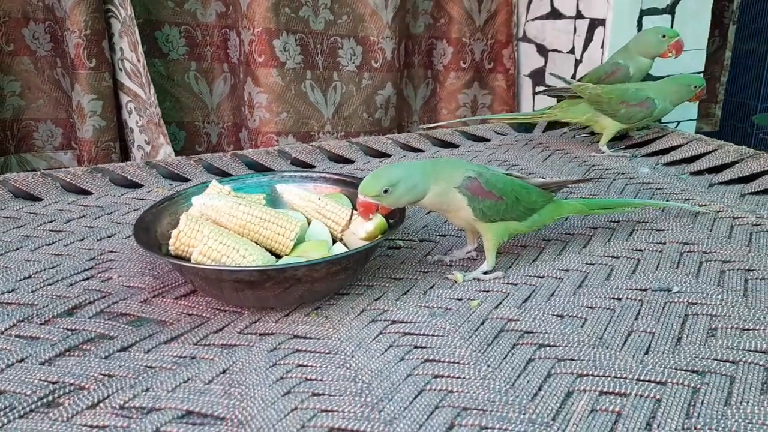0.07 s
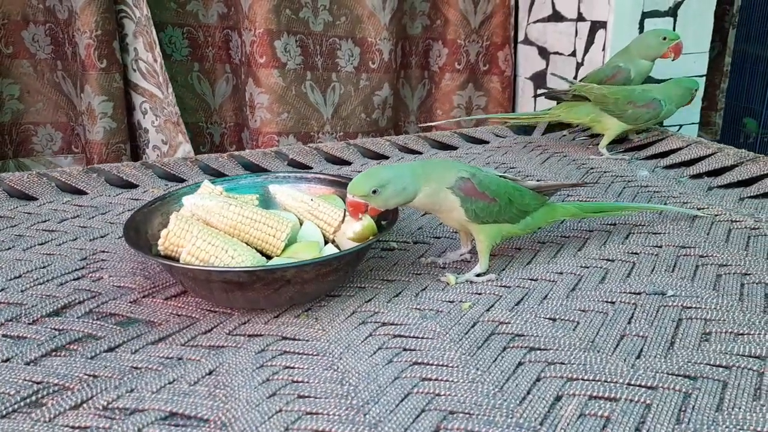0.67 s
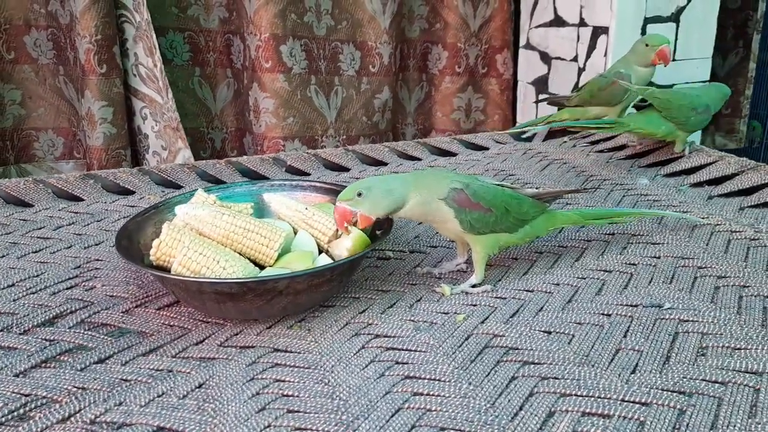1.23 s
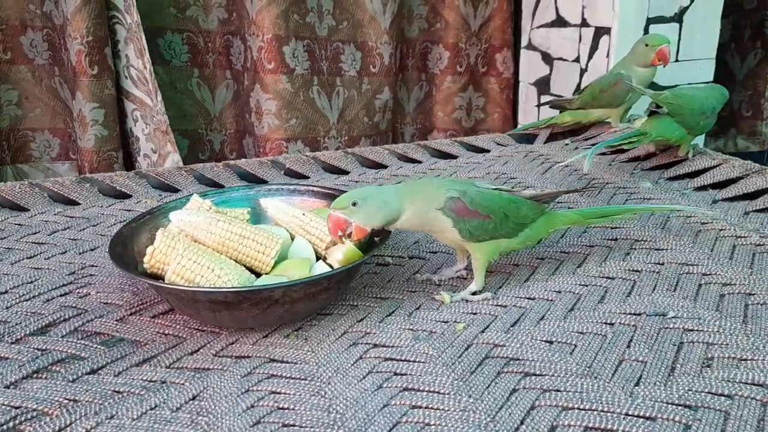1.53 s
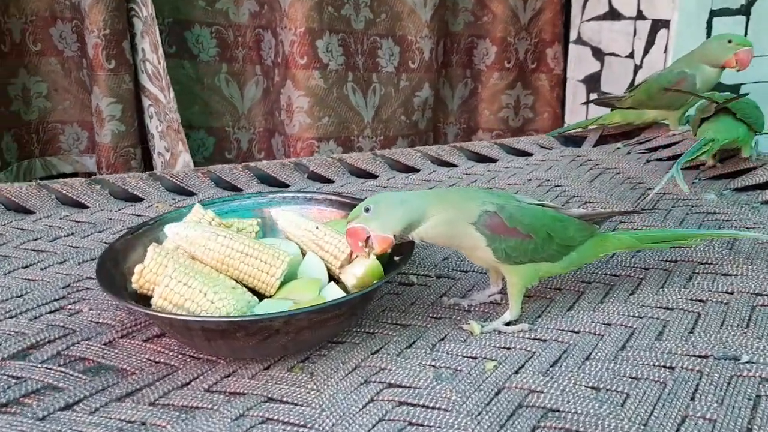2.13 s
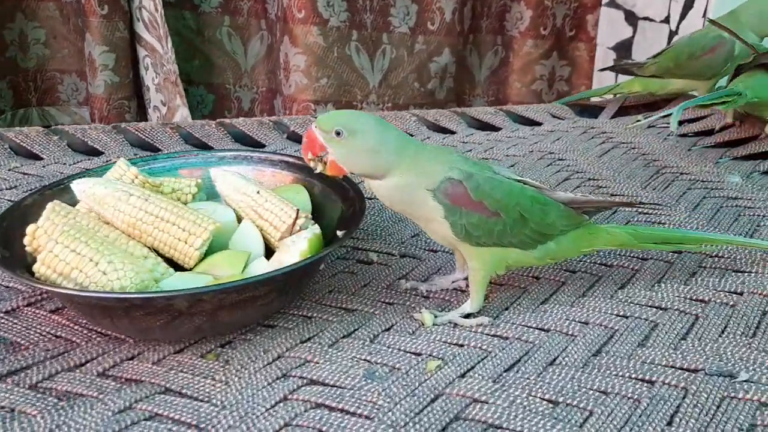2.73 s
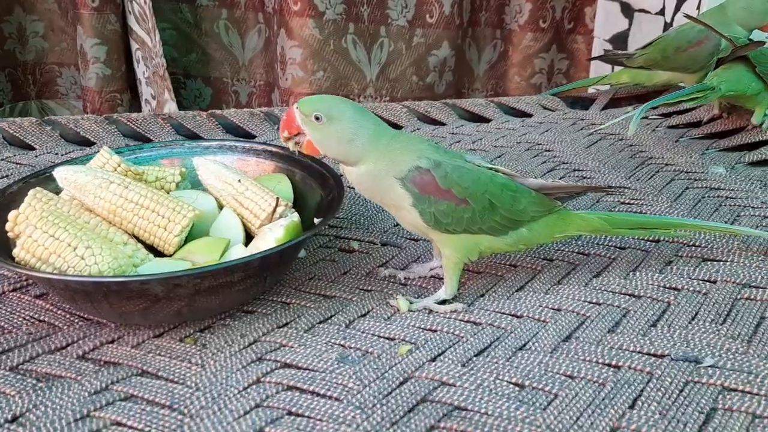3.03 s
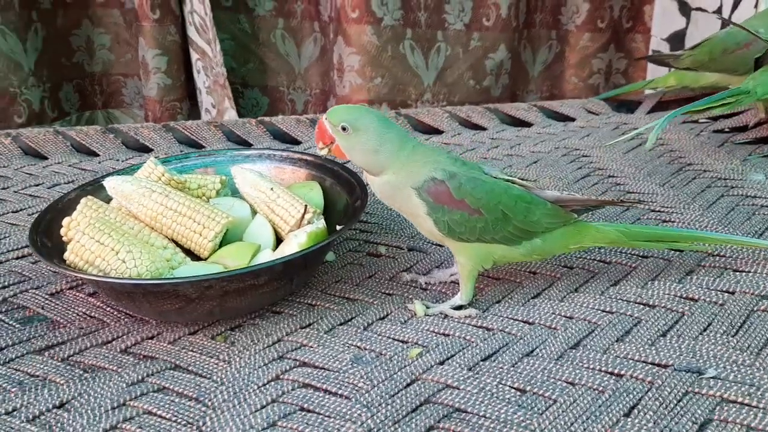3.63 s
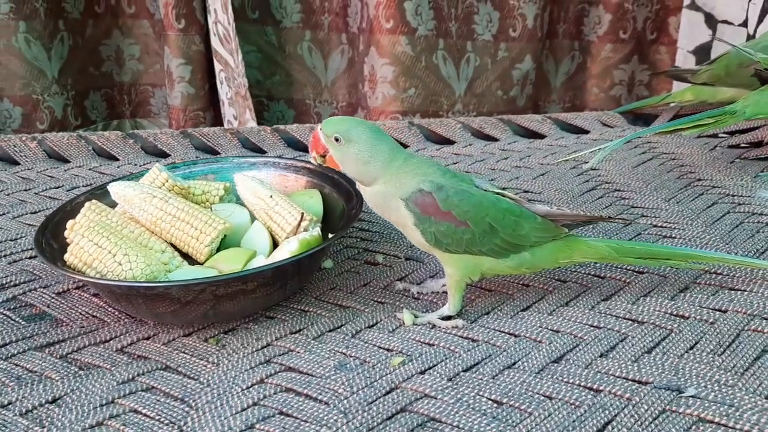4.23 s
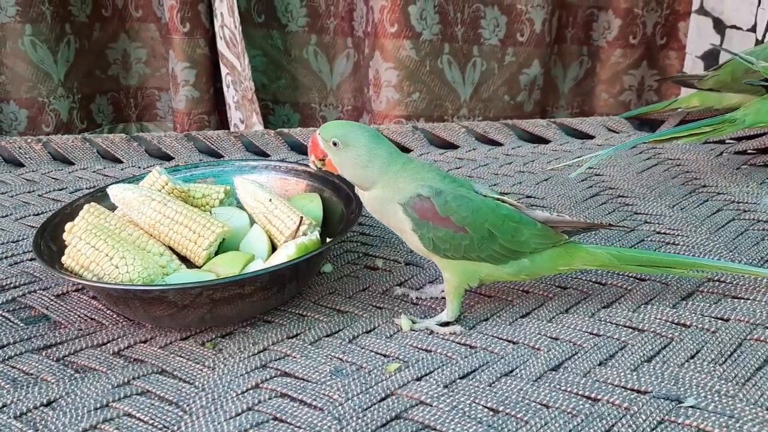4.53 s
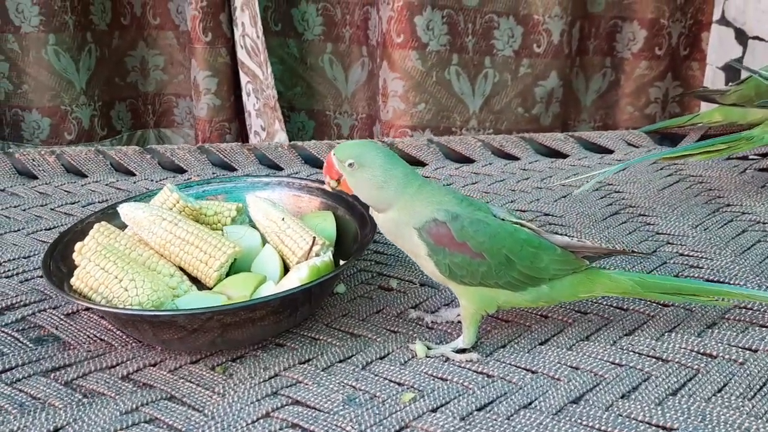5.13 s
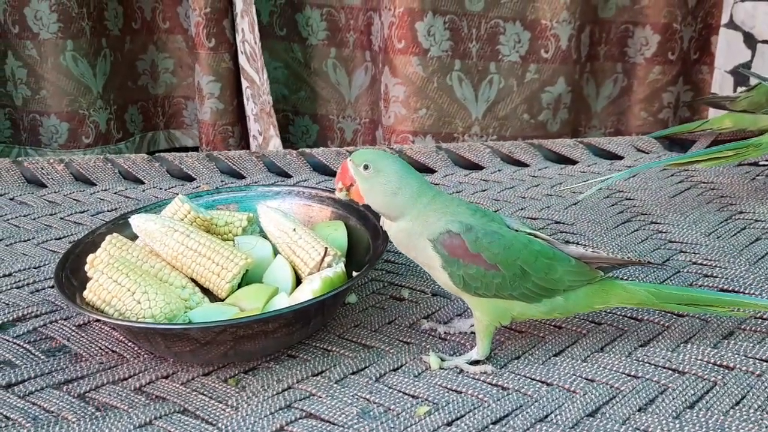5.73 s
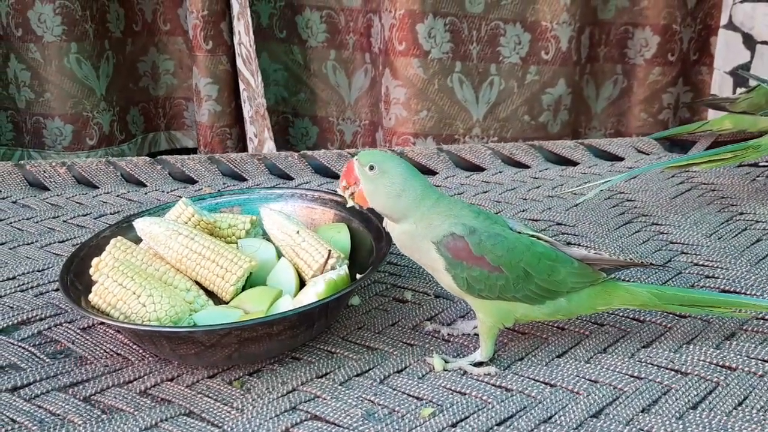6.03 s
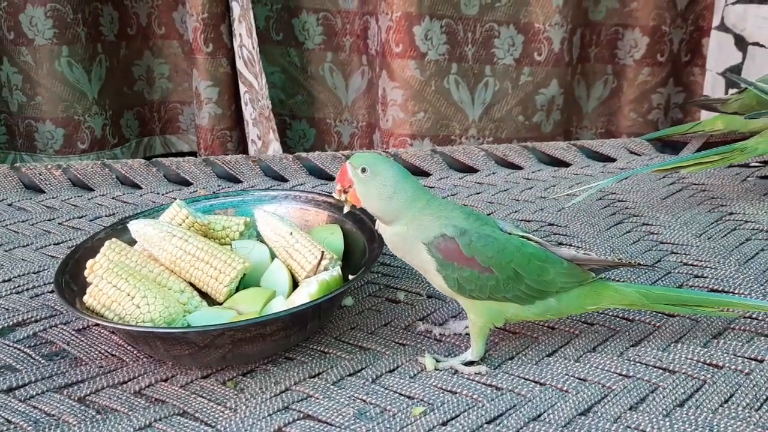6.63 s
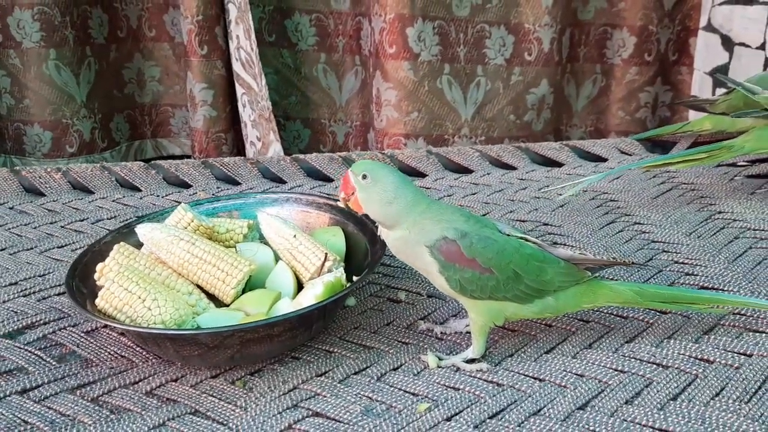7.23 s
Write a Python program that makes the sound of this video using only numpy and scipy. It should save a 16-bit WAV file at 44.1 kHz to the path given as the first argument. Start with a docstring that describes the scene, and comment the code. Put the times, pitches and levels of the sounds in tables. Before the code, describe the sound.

Three loud, harsh parrot squawks open the scene, at the very start, at about 0.8 seconds and at about 2 seconds. Each is a short buzzy rasp followed by a longer piercing cry, close, toward the left, with a small room echo. A distant engine throbs low under a soft wash of outdoor air throughout, growing somewhat stronger from about 4 seconds. Very faint feather rustles come and go between 2 and 6 seconds, and blurred far-off bird calls appear near 1.8, 3.2, 4.5 and 7.4 seconds. At 3.8 seconds a beak quietly cracks a kernel, and at 4 seconds a metal bowl rings faintly from light touches. At 5.5 seconds comes one thin squeak that rises scratchily, whistles and falls into a rasp. Four more small, dry cracks follow at about 6, 6.7, 7 and 7.2 seconds.

```python
"""Parakeets on a woven cot in a small room, with an engine throbbing outside all the way through.
First come three harsh squawks, each a rasp and then a cry, buzzed by the two sides of a bird's voice box.
From about 2 seconds on, feathers rustle and other birds call far off. Near 4 seconds one bird starts
to nibble and lightly rings its metal bowl. At 5.5 seconds there is one thin squeak,
and after it a beak cracks a few more kernels."""
import sys
import numpy as np
from scipy import signal
from scipy.fft import rfft, irfft, next_fast_len
from scipy.io import wavfile

SR = 44100
rng = np.random.default_rng(int(sys.argv[2]) if len(sys.argv) > 2 else 0)


def to_wav(sig):
    """Store sig (one row per channel, or 1-D mono) as 16-bit WAV at the path in sys.argv[1].

    Samples outside -1..1 are clipped; the rate is SR.
    """
    pcm = np.clip(np.atleast_2d(sig), -1, 1) * 32767
    pcm = np.round(pcm).astype(np.int16)
    wavfile.write(sys.argv[1], SR, pcm.T)  # frames by channels


N = 330309
TIME = np.arange(N) / SR
TOP_HZ = 15600  # upper limit of the treble


def voice_box(hz, rough, throat, side_ratio, flutter, throb, low_beat, jitter, fray, hiss_db):
    """A bird's voice box has two sides that buzz at different pitches and shake each other."""
    rough, count = np.clip(rough, 0, 1), len(hz)
    wobble = (.0015 + .005 * rough ** 4) * band(count, 0, 300)
    upper_cycles = np.cumsum(hz * (1 + wobble)) / SR
    # the lower side drifts, and loses its beat as the voice breaks up
    lower_cycles = side_ratio * upper_cycles + .06 * band(count, 0, 50)
    lower_cycles += .07 * rough ** 5 * band(count, 0, 400)
    # beats between the sides put extra tones around every harmonic
    beat = 2 * np.pi * (upper_cycles - lower_cycles)
    shake = np.sin(2 * np.pi * (2 * lower_cycles - upper_cycles)) + low_beat * np.sin(beat)
    shake *= 1 + .22 * band(count, 0, 70)
    phase = 2 * np.pi * upper_cycles + jitter * rough ** 3 * band(count, 0, 1800)
    sway = flutter * rough ** .3 * shake
    blur = fray * rough * band(count, 0, 500)
    buzz = np.zeros(count)
    for k in range(16):
        unsteady = sway * min(k * k / 7, 7) + blur * np.clip(k - 3, 0, 3)  # low harmonics stay firm
        smear = k * k / 2  # the airway smears each pulse
        buzz += np.cos(k * phase + unsteady + smear) * (k * hz < TOP_HZ)
    # the beat also sounds by itself, faint and hoarse
    undertone = amp(-25.5) * (np.cos(beat) + np.cos(2 * beat)) * (.55 + .7 * band(count, 0, 350))
    # rushing air hisses in puffs, once a cycle
    hiss = shaped(rng.standard_normal(count), lambda f: amp(read([(4500, -19), (9500, 0)], f)))
    puffs = amp(hiss_db) * rough * hiss * (1 + 1.8 * np.cos(phase))
    source = (unit(buzz) + undertone + puffs) * (1 + throb * np.sqrt(rough) * shake)
    return unit(shaped(source, lambda f: amp(read(throat, f)) * high_pass(f, 330)))


# How throat and beak colour a rasp. Each row: frequency in Hz, gain in dB.
RASP_COLOUR = [(300, -2), (780, -1), (1050, -6.5), (1450, -10.5), (2120, 8), (2400, 6.5), (2700, 11),
               (3200, 12.5), (3500, 14.5), (4150, 0.5), (4800, -3), (6100, -1.5), (7100, -5.5),
               (8800, -5.5), (10800, -18.5), (12400, -13.5), (15500, -22)]

def rasp(length, pitch_hz, flick, db, swell_db, first_rough, last_rough, first_low_db, last_low_db):
    """A short note, its two sides locked at five to eight, that flicks upward and frays at the end."""
    t = np.arange(0, length, 1 / SR)
    flick_before_end_s, flick_width_s, break_up_s = .014, .021, .085
    hz = pitch_hz * (1 + flick * np.exp(-abs(length - flick_before_end_s - t) / flick_width_s))
    rough = first_rough + (last_rough - first_rough) * np.exp(-((length - t) / break_up_s) ** 4)
    voice = voice_box(hz, rough, RASP_COLOUR, side_ratio=5 / 8, flutter=.36, throb=.68,
                      low_beat=.2, jitter=.2, fray=.65, hiss_db=-1.5)
    # the throat's low ring, at 2070 Hz, swells or fades as the beak moves
    low_ring = shaped(voice, lambda f: np.exp(-((f - 2070) / 190) ** 2))
    voice += low_ring * (amp(np.linspace(first_low_db, last_low_db, len(t))) - 1)
    level = amp(db + swell_db * (t / length - .5))
    return level * envelope(t, attack_s=.011, release_s=.0074) * voice


# How throat and beak colour a cry. Each row: frequency in Hz, gain in dB.
CRY_COLOUR = [(450, 4), (750, 2), (1150, -13.5), (1580, 2), (2000, 1), (2320, 4.5), (2570, 9), (2850, -0.5),
              (3180, 7), (3450, 12.5), (3750, 10.5), (4050, -1.5), (4620, 0), (5100, -5), (5750, -8.5),
              (6450, -7), (7000, -6), (7350, -4.5), (7700, -10.5), (8100, -4), (8700, -10), (9250, -8),
              (10300, -17), (11300, -15), (11900, -22), (12700, -13.5), (15500, -22.5)]

def cry(course):
    """A longer, piercing note that scoops up roughly, rings clear, and drops as it ends."""
    t = np.arange(0, course[-1][0] - course[0][0], 1 / SR)
    hz, db = curves(course, course[0][0] + t)
    scoop_s, drop_s = .068, .0145
    scoop = np.exp(-(t / scoop_s) ** 4)
    drop = np.exp(-((t[-1] - t) / drop_s) ** 2)
    tremor = .0018 * band(len(t), 0, 158)
    hz = hz * (1 + tremor - .074 * drop)
    rough = .2 + .22 * (scoop + drop)
    voice = voice_box(hz, rough, CRY_COLOUR, side_ratio=.612, flutter=.23, throb=.37,
                      low_beat=.45, jitter=.8, fray=.45, hiss_db=1)
    return amp(db + 2.07) * envelope(t, attack_s=.012, release_s=.0055) * voice


# The first note of each squawk. Each row: start and length in seconds, pitch in Hz, upward flick as a
# share of the pitch, level in dB, swell in dB, first and last roughness from 0 to 1, first and last
# gain of the throat's low ring in dB.
RASP_NOTES = [(-.125, .148, 1065, .13, -14, -2, .4, .6, 0, 0),
              (0.827, .155, 1042, .15, -18, 3.5, .52, .6, 1, 1),
              (1.96, .143, 1050, .115, -17.2, -2, .42, .62, 6, -3)]
# The second note of each squawk, one list per cry. Each row: time in seconds, pitch in Hz, level in dB.
CRY_COURSES = [
    [(0.097, 1112, -28.5), (0.122, 1079, -18.5), (0.155, 1150, -17), (0.186, 1175, -21),
     (0.225, 1144, -17.5), (0.26, 1147, -15.5), (0.3, 1163, -19.5), (0.338, 1180, -22), (0.362, 1174, -33)],
    [(1.066, 1058, -28), (1.102, 1085, -19), (1.146, 1140, -17), (1.186, 1157, -17.5), (1.218, 1139, -15.5),
     (1.264, 1147, -19.5), (1.296, 1178, -20), (1.328, 1167, -34)],
    [(2.187, 1076, -29), (2.22, 1081, -19), (2.25, 1151, -18), (2.274, 1163, -16), (2.308, 1139, -18),
     (2.335, 1138, -16), (2.38, 1133, -17.5), (2.405, 1173, -27.5), (2.432, 1130, -36)],
]

def squawks():
    """Each squawk is a rasp and then a cry."""
    out = np.zeros(N)
    for start, *row in RASP_NOTES:
        add(out, start, rasp(*row))
    for course in CRY_COURSES:
        add(out, course[0][0], cry(course))
    return out


# The rough slides around the whistle. Each row: start and length in seconds, first and last pitch in Hz,
# level in dB, first and last roughness from 0 to 1, fade-in and fade-out in seconds.
SQUEAK_SLIDES = [(5.503, 0.049, 1514, 2726, -23.5, 1, 0.65, 0.054, 0.0027),
                 (5.659, .022, 2850, 2500, -24, .4, .55, .008, .004),
                 (5.676, .02, 2350, 1600, -19, .55, .75, .004, .004),
                 (5.69, 0.0393, 1747, 1500, -23.5, 1, 0.85, 0.0067, 0.02)]
# How throat and beak colour the slides. Each row: frequency in Hz, gain in dB.
SQUEAK_COLOUR = [(500, -18), (2050, -15), (2700, -4), (3400, -0.5), (4100, 0), (5300, -6), (6500, -10),
                 (8300, -13.5), (10500, -17), (12400, -21), (15500, -18)]

def squeak():
    """A scratchy rise jumps into a thin whistle, which cracks and collapses into a falling rasp."""
    out = np.zeros(N)
    for start, length, first_hz, last_hz, db, first_rough, last_rough, *fades in SQUEAK_SLIDES:
        t = np.arange(0, length, 1 / SR)
        hz = np.geomspace(first_hz, last_hz, len(t))
        rough = np.linspace(first_rough, last_rough, len(t))
        voice = voice_box(hz, rough, SQUEAK_COLOUR, side_ratio=.53, flutter=.094, throb=.88,
                          low_beat=.96, jitter=.85, fray=.35, hiss_db=-17)
        add(out, start, amp(db) * envelope(t, *fades) * voice)
    add(out, WHISTLE_COURSE[0][0], whistle())
    return out


# The whistle in the middle of the squeak. Each row: time in seconds, pitch in Hz, level in dB.
WHISTLE_COURSE = [(5.548, 4107, -43), (5.555, 4090, -31), (5.564, 4040, -33), (5.573, 4098, -13),
                  (5.581, 4125, -19.5), (5.635, 4120, -20.5), (5.657, 4013, -28.5), (5.672, 3930, -20.5),
                  (5.68, 3770, -36)]
# Its overtones. Each row: multiple of the pitch, level in dB next to the main tone.
WHISTLE_OVERTONES = [(2, -11.5), (3, -18)]

def whistle():
    """A thin tone with fuzzy overtones that holds its pitch and then sags."""
    t = np.arange(WHISTLE_COURSE[0][0], WHISTLE_COURSE[-1][0], 1 / SR)
    hz, db = curves(WHISTLE_COURSE, t)
    phase = 2 * np.pi * np.cumsum(hz) / SR
    tone = np.cos(phase)
    for multiple, overtone_db in WHISTLE_OVERTONES:
        fuzz = unit(1 + .7 * band(len(t), 0, 1000))
        tone += amp(overtone_db) * np.cos(multiple * phase) * fuzz
    hiss = amp(-27) * rng.standard_normal(len(t))
    return amp(db) * unit(tone + hiss)


# A beak cracking kernels. Each row: start in seconds, level in dB, ring of the beak in Hz.
KERNEL_CRACKS = [(3.8069, -41, 1732), (6.0007, -39.5, 1610), (6.7394, -38, 1836), (6.9835, -36, 1720),
                 (7.2463, -44, 2003)]

def nibbles():
    """Short dry cracks, given a woody body by the hollow beak."""
    out, t = np.zeros(N), np.arange(SR // 10) / SR
    for start, db, hz in KERNEL_CRACKS:
        body = band(len(t), hz, 1300) * np.exp(-t / .009)
        snap = band(len(t), 3500, 6000) * np.exp(-t / .003)
        add(out, start, amp(db - 3.5) * (body + .25 * snap))
    return out


# Light touches on the bowl. Each row: start in seconds, level in dB.
BOWL_TOUCHES = [(3.976, -53), (4.034, -46), (4.07, -76)]
# The bowl's own tones. Each row: frequency in Hz, level in dB, seconds to fade by 60 dB.
BOWL_TONES = [(3192, -8, .6), (4732, -4, .6), (7004, -6, .45), (7127, -4.5, .45), (9895, -4.5, .45),
              (13119, -11, .3)]

def bowl():
    """Each touch sets the metal ringing with a few thin, fading tones."""
    out, t = np.zeros(N), np.arange(SR // 2) / SR
    for start, db in BOWL_TOUCHES:
        ring = sum(amp(tone_db - 60 * t / fade_s) * np.sin(2 * np.pi * (hz * t + rng.random()))
                   for hz, tone_db, fade_s in BOWL_TONES)
        add(out, start, amp(db - 10.5) * ring)
    return out


# Brushes against the cot. Each row: time of the middle in seconds, length in seconds, level in dB.
BRUSHES = [(1.85, 0.06, -58.5), (2.768, 0.043, -65), (3.286, 0.2, -60.5), (3.435, 0.22, -67),
           (4.05, 0.17, -57), (4.373, 0.23, -64.5), (5.953, 0.031, -62)]

def rustles():
    """Feathers and claws brush the weave, making soft, grainy swells of noise."""
    out = np.zeros(N)
    for middle, length, db in BRUSHES:
        count = int(length * SR) + 64
        grains = unit(band(count, 4300, 33000) * amp(3.6 * band(count, 0, 505.3)))
        add(out, middle - length / 2, amp(db) * grains * np.hanning(count))
    return out


# Birds far off. Each row: time of the middle and length in seconds, centre and half-width of the
# noise in Hz, level in dB.
DISTANT_CALLS = [(1.8, .3, 1980, 400, -55.5), (3.18, .24, 3950, 400, -63.5), (4.48, .46, 2030, 450, -52.5),
                 (7.44, .34, 2000, 350, -50.5), (7.38, .4, 5150, 550, -67)]

def far_birds():
    """Hoarse calls, blurred by distance until only their strongest band is left."""
    out = np.zeros(N)
    for middle, length, hz, half_width, db in DISTANT_CALLS:
        count = int(length * SR)
        add(out, middle - length / 2, amp(db) * band(count, hz, 2 * half_width) * np.hanning(count))
    return out


# The engine's speed. Each row: time in seconds, firings per second.
FIRING_RATE = [(0.0, 31), (0.1, 27.8), (0.6, 30), (1.11, 31.8), (2.54, 31.4), (3.15, 29.9), (5.74, 31.7),
               (7.49, 32.2)]
# Its boom, at twice the firing rate. Each row: time in seconds, level in dB.
BOOM_LEVEL = [(0.0, -51), (0.19, -53), (1.58, -55), (3.73, -47), (4.11, -37), (5.19, -33), (5.28, -45),
              (6.76, -40), (7.49, -61)]
# Its drone, at five times the firing rate. Each row: time in seconds, level in dB.
DRONE_LEVEL = [(0.0, -62), (0.06, -42.5), (0.37, -64), (3.36, -38), (3.46, -55.5), (4.25, -33.5),
               (4.63, -41.5), (4.82, -35.5), (5.61, -40), (5.78, -53), (6.7, -47.5), (6.92, -35),
               (7.15, -53), (7.49, -79)]
# Its weaker tones. Each row: multiple of the firing rate, level in dB.
WEAK_TONES = [(3, -68), (4, -45), (6, -53.5), (9, -60), (10, -54.5), (11, -60)]

def engine():
    """A far engine: only low multiples of its firing rate get through the walls, beating into a throb."""
    cycles = np.cumsum(curves(FIRING_RATE, TIME)[0]) / SR
    levels_db = {k: db + 4.5 * band(N, 0, 4.4) for k, db in WEAK_TONES}  # these swell and fade by chance
    levels_db[2] = curves(BOOM_LEVEL, TIME)[0] - 2
    levels_db[5] = curves(DRONE_LEVEL, TIME)[0] + 3
    out = np.zeros(N)
    for multiple, db in levels_db.items():
        tone = np.cos(2 * np.pi * multiple * cycles + .18 * band(N, 0, 12))
        waver = 1 + .18 * band(N, 0, 12)
        out += amp(db) * unit(tone * waver)
    return out


# The colour of the air in the yard. Each row: frequency in Hz, gain in dB.
AIR_COLOUR = [(20, -41), (34, -10), (48, -14.5), (70, -1.5), (100, -1.5), (160, 0.5), (235, -13), (340, -6),
              (690, -20.5), (1200, -22), (2130, -26.5), (4500, -37.5), (12800, -48.5), (15000, -55)]
# How loud the air is. Each row: time in seconds, level in dB.
AIR_LOUDNESS = [(0, -40.5), (1.6, -41), (2.7, -40.5), (3.6, -39), (4.2, -36), (5.2, -36.5), (6.2, -37.5),
                (7.49, -36.5)]
# How alike it is on the left and right. Each row: frequency in Hz, likeness from 0 to 1.
AIR_LIKENESS = [(60, 1), (150, 0.82), (380, 0.72), (950, 0.022), (2380, 0.051), (5980, 0.0094),
                (15000, 0.013)]

def air():
    """A wash of outdoor noise, alike on both sides in the bass and spread out higher up."""
    left, other = rng.standard_normal((2, N))
    likeness = lambda f: np.clip(read(AIR_LIKENESS, f), 0, 1)
    right = shaped(left, likeness) + shaped(other, lambda f: np.sqrt(1 - likeness(f) ** 2))
    wash = np.array([unit(shaped(side, lambda f: amp(read(AIR_COLOUR, f)))) for side in (left, right)])
    flicker_db = .5 * band(N, 0, 36)
    return wash * amp(curves(AIR_LOUDNESS, TIME)[0] + flicker_db)


# How the room's early echoes die away. Each row: frequency in Hz, seconds to fade by 60 dB.
ROOM_FADE = [(200, 0.2), (1000, 0.41), (2250, 0.24), (3450, 0.22), (8000, 0.2), (15000, 0.21)]

def room(x, wet_db):
    """The walls send back scattered echoes, each band of pitch dying at its own speed."""
    echoes = np.zeros((2, SR))
    slots = np.arange(200, SR - 20, 20)
    arrivals = slots + rng.integers(0, 20, (2, len(slots)))
    np.put_along_axis(echoes, arrivals, rng.choice([-1., 1.], arrivals.shape), 1)
    hz, t, bands = signal.stft(echoes, SR, nperseg=256)
    early_db = -60 * t / read(ROOM_FADE, hz)[:, None]
    late_db = -13.5 + early_db / 2.08  # a weak ring that lasts about twice as long
    tail = signal.istft(bands * (amp(early_db) + amp(late_db)), SR, nperseg=256)[1]
    return amp(wet_db) * signal.fftconvolve(x[None], tail / np.linalg.norm(tail[0]), axes=1)[:, :N]


def glints(x, db):
    """Small surfaces close by throw back only the treble, differently to each side, making it ragged."""
    delays_s = rng.uniform(.001, .007, (2, 5))
    bounces = lambda f, side: sum(np.exp(-2j * np.pi * f * s) for s in side) * high_pass(f, 5500)
    return amp(db) * np.array([shaped(x, lambda f: bounces(f, side)) for side in delays_s])


def placed(x, left_db, lag_ms):
    """A sound is louder and earlier on its nearer side; left_db is a number or a table by frequency."""
    lead = lambda f: amp((read(left_db, f) if np.ndim(left_db) else left_db) / 2)
    delay = lambda f: np.exp(-2j * np.pi * f * lag_ms / 1000)
    return np.array([shaped(x, lead), shaped(x, lambda f: delay(f) / lead(f))])


def amp(db):
    """Turns decibels into a gain."""
    return 10 ** (np.asarray(db) / 20)


def unit(x):
    """Scales a sound to an average strength (rms) of 1."""
    return x / np.sqrt(np.mean(x ** 2) + 1e-20)


def read(points, hz):
    """Looks up a table by frequency, joining its rows with straight lines on a log axis."""
    f, value = np.transpose(points)
    return np.interp(np.log(hz + 1), np.log(np.abs(f) + 1), value)


def curves(rows, t):
    """Looks up every column of a table at the times t."""
    times, *columns = np.transpose(rows)
    return [np.interp(t, times, column) for column in columns]


def add(mix, start_s, sound):
    """Mixes a sound in, cutting off whatever falls outside the mix."""
    at = round(start_s * SR)
    sound = sound[max(0, -at):]
    part = mix[max(0, at):][:len(sound)]
    part += sound[:len(part)]


def shaped(x, gain):
    """Filters x by a gain that depends on frequency."""
    size = next_fast_len(len(x) + 1024)
    return irfft(rfft(x, size) * gain(np.fft.rfftfreq(size, 1 / SR)), size)[:len(x)]


def high_pass(f, corner_hz):
    """A gain that shuts out what lies below the corner."""
    return f ** 4 / (f ** 4 + corner_hz ** 4)


def band(count, centre_hz, width_hz):
    """Noise of strength 1 around one frequency; around zero it is a random wander."""
    hump = lambda f: 1 / (1 + (2 * (f - centre_hz) / width_hz) ** 2) ** 2
    return unit(shaped(rng.standard_normal(count), hump))


def envelope(t, attack_s, release_s):
    """Fades in, holds and fades out."""
    return np.clip(t / attack_s, 0, 1) * np.clip((t[-1] - t) / release_s, 0, 1)


# How much louder the direct squawks are on the left. Each row: frequency in Hz, lead in dB.
SQUAWK_LEFT_LEAD = [(1150, 8), (2300, 7.5), (3400, 9.5), (4600, 4.5), (7000, 3.5), (8500, 4), (12000, 11)]

def scene():
    """Birds and bowl in the room, over the sounds from outside."""
    calls, squeal, small_sounds, cracks = squawks(), squeak(), rustles() + bowl(), nibbles()
    inside = amp(-4) * (placed(calls, left_db=SQUAWK_LEFT_LEAD, lag_ms=.18) + room(calls, wet_db=-2))
    inside += glints(calls, db=-10) * amp([[2], [-2]])
    inside += amp(-4) * (placed(squeal, left_db=-1, lag_ms=-.021) + room(squeal, wet_db=0))
    inside += placed(small_sounds, left_db=12, lag_ms=0) + room(small_sounds, wet_db=6.5)
    inside += placed(cracks, left_db=2, lag_ms=0) + room(cracks, wet_db=-7)
    outside = air() + engine() + amp(5.5) * np.array([far_birds(), far_birds()])
    return inside + outside * amp([[1.4], [-1.6]])


def record(dry):
    """Cuts off the very highest treble."""
    low_pass = signal.firwin(511, TOP_HZ, window=("kaiser", 9), fs=SR)
    return signal.oaconvolve(dry, low_pass[None], "same")


dry = scene()
out = record(dry)
to_wav(out)
```